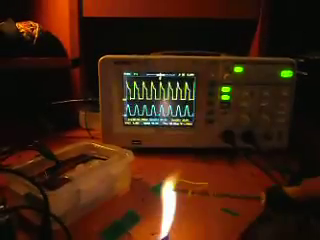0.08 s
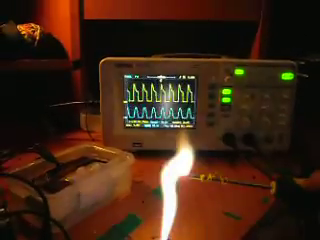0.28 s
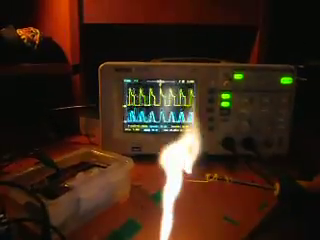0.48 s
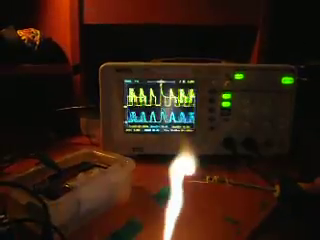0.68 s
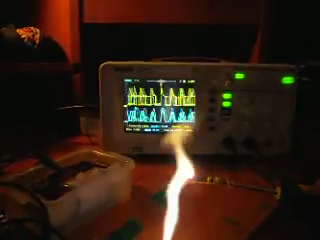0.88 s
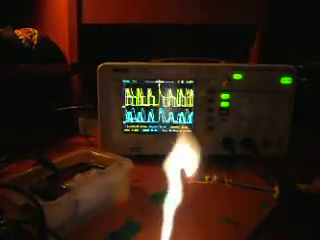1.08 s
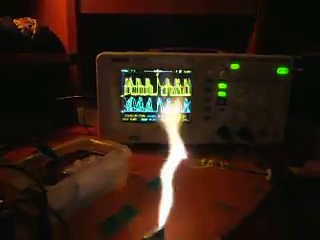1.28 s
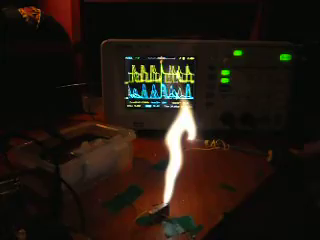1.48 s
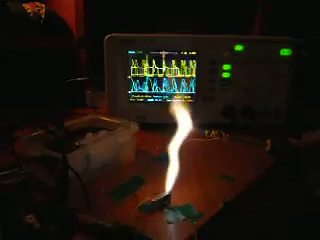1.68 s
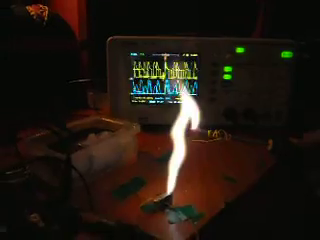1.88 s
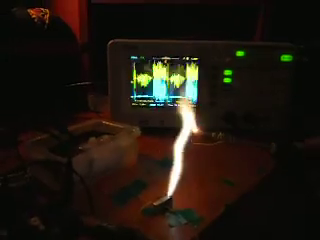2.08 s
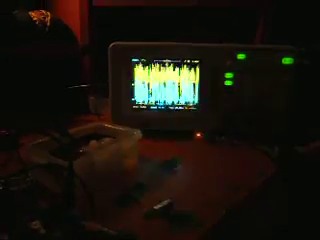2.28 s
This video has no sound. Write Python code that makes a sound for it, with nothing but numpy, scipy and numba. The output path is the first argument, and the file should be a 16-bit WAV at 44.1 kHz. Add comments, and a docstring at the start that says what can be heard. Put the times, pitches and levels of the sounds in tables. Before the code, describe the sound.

High-voltage electric arc buzzing and crackling in harsh, broken bursts, growing denser, then sputtering out

```python
"""A faint hiss and a thin steady whine come first, then the weak, broken buzzes of a high-voltage arc in a workshop.
The buzz soon grows loud: the arc restrikes about 850 to 8000 times a second in short runs whose rate often sags
as it stretches, until it breaks and sputters. Each spark is a pulse, with the hiss of hot gas added to ragged runs.
The whine is a sine, the hiss beneath is filtered noise, the short room tail is decaying noise convolved with the
arc, and the microphone stage flattens the loudest peaks."""
import sys
import numpy as np
from scipy import signal
from scipy.fft import rfft, irfft
from scipy.io import wavfile
from scipy.ndimage import uniform_filter1d
from numba import njit

SR = 44100
rng = np.random.default_rng(int(sys.argv[2]) if len(sys.argv) > 2 else 0)


def wav_record(signal):
    """Record a signal, one row per channel, as 16-bit PCM in the file named by sys.argv[1]."""
    frames = np.transpose(np.atleast_2d(signal))
    bounded = np.clip(frames, -1, 1)
    # unit amplitude maps onto the largest positive 16-bit level
    quanta = np.round(bounded * 32767).astype(np.int16)
    wavfile.write(sys.argv[1], SR, quanta)


def natural_amplitude(level_db):
    """Convert a level in decibels to a linear amplitude factor, elementwise."""
    exponent = np.asarray(level_db, float) / 20
    return 10 ** exponent


N = 105840  # length in samples


def unit(x):
    """Normalisation: scale a signal to an rms of 1."""
    return x / np.sqrt(np.mean(x ** 2))


def colour(x, points, size=1024):
    """Minimum-phase filtering: the folded cepstrum turns (f/Hz, gain/dB) points into a causal response."""
    p = np.array(points)
    f = np.arange(size + 1) * SR / size / 2
    gain_db = np.interp(np.log(f + 1), np.log(p[:, 0]), p[:, 1])
    cepstrum = irfft(np.log(natural_amplitude(gain_db)))
    cepstrum[1:size] *= 2
    cepstrum[size + 1:] = 0
    response = irfft(np.exp(rfft(cepstrum)))
    return signal.fftconvolve(x, response)[:N]


def walk(hz):
    """Random modulation: a new Gaussian level every 1 / hz seconds, joined by ramps, with an rms of 1."""
    hold = int(SR / hz)
    levels = np.repeat(rng.standard_normal(N // hold + 1), hold)
    return unit(uniform_filter1d(levels, hold)[:N])


# spectral shape of the noise floor: (f/Hz, relative level/dB)
FLOOR_SHAPE = [(18, -27.5), (30, -5.5), (319, -11.5), (607, -5.5), (717, -20), (868, -3.5), (1470, -21),
               (6000, -22), (8180, -28.5), (9000, -52), (11700, -88.5), (19800, -120)]
FLOOR_DB = -52.5  # rms level


def noise_floor():
    """Stationary random noise: white noise shaped in frequency and set to a fixed rms level."""
    return natural_amplitude(FLOOR_DB) * unit(colour(rng.standard_normal(N), FLOOR_SHAPE))


# level of the whine before the microphone stage: (t/s, rms level/dB)
WHINE_LEVEL = [(0, -41.5), (.9, -43), (1.1, -48), (1.3, -83), (2.4, -59)]
WHINE_HZ = 873


def whine():
    """Pure tone: a sine of constant frequency that fades after 1.1 s as the arc burns on, then creeps up faintly."""
    t = np.arange(N) / SR
    points = np.array(WHINE_LEVEL)
    rms = natural_amplitude(np.interp(t, points[:, 0], points[:, 1]))
    return np.sqrt(2) * rms * np.sin(2 * np.pi * WHINE_HZ * t)


DRIVER_HZ, LOCK_BELOW_HZ = 24050., 2700.  # ultrasonic driver; rate below which restrikes follow its cycles


@njit
def strikes(hz, scatter, late, size, driver, lock):
    """Relaxation oscillation: a spark at each wrap of the phase, then a new period drawn for the next cycle."""
    out, phase, step = np.zeros(len(hz) + 1), 0., .1
    for i in range(len(hz)):
        phase += step
        if phase >= 1:
            # share the spark between two samples to place it between them
            late_part = (phase - 1) / step
            out[i] += size[i] * late_part
            out[i + 1] += size[i] * (1 - late_part)
            rate = hz[i] * np.exp(scatter[i] * late[i])
            if rate < lock:
                # slow periods last a whole number of driver cycles
                rate = driver / np.round(driver / rate)
            step = rate / SR
            phase = late_part * step
    return out[:-1]


# runs of restrikes before drift and flutter:
# (start t/s, length t/s, first rate f/Hz, last rate f/Hz, level/dB, timing scatter 0-1)
RUNS = [ (.007, 0.0098, 3623, 3524, -44, 0.18), (.038, .007, 3004, 3599, -44.5, 0.24),
        (0.07, 0.0043, 3486, 3492, -45, 0.34), (0.084, 0.0046, 3611, 3500, -39, 0.22),
        (.093, .009, 3611, 3505, -34, 0.16), (.103, .007, 3992, 3989, -39.5, 0.35),
        (0.113, 0.0038, 3654, 3504, -40, 0.23), (0.128, 0.0051, 4507, 4500, -44.5, .3),
        (0.152, 0.0061, 3500, 3502, -49, 0.46), (0.172, 0.0078, 3003, 3019, -35, .3),
        (0.183, 0.021, 2998, 3561, -37, 0.21), (0.206, 0.0053, 2921, 2903, -32.5, .2),
        (0.218, .017, 1606, 1209, -12.5, .1), (.234, 0.0084, 1756, 1736, -12.5, .1),
        (0.244, .004, 1600, 1493, -17, .3), (.29, 0.0076, 2990, 3000, -30.5, .3),
        (0.299, .018, 1543, 1256, -12, .1), (0.323, 0.0038, 1610, 1503, -9.5, 0.21),
        (0.353, .003, 1497, 1496, -15.5, 0.32), (0.36, .008, 1692, 1599, -12.5, 0.02),
        (.374, 0.028, 1605, 955, -10.5, 0.2), (0.405, 0.012, 1857, 1849, -10, 0.12),
        (0.432, 0.024, 1951, 959.5, -8.5, 0.13), (.462, 0.0072, 1101, 904, -11.5, 0.11),
        (0.469, .016, 1477, 2011, -8.5, 0.06), (0.521, .002, 2000, 2000, -16.5, .3),
        (0.532, 0.018, 1595, 956.8, -12, 0.12), (0.553, 0.012, 1550, 1900, -10, 0.2),
        (.613, 0.0078, 3000, 3000, -33.5, .3), (0.627, .005, 3000, 2992, -30.5, 0.27),
        (.678, .004, 3003, 2471, -28.5, 0.31), (.69, 0.013, 1554, 1200, -9.5, 0.09),
        (.705, 0.015, 1859, 1897, -9.5, 0.08), (0.766, 0.015, 1554, 1048, -10.5, 0.14),
        (0.781, 0.0093, 1793, 1833, -10.5, 0.14), (0.844, 0.014, 1549, 1296, -14, 0.14),
        (0.8684, .001, 2862, 2900, -9.5, .3), (0.908, 0.0056, 2795, 2805, -30, .3),
        (0.916, 0.027, 1743, 950, -9.5, 0.06), (.992, 0.0046, 1802, 1803, -10.5, 0.25),
        (1.005, 0.044, 1898, 1800, -11.5, 0.1), (1.06, .003, 1995, 1988, -9.5, .3),
        (1.067, .004, 2503, 2499, -24.5, 0.23), (1.078, .021, 1918, 844.8, -12, 0.07),
        (1.106, 0.046, 1797, 1713, -11, 0.14), (1.151, 0.022, 1505, 897.4, -9, 0.07),
        (1.178, 0.0051, 2500, 2044, -10.5, .05), (1.183, .014, 1860, 1845, -8, 0.03),
        (1.197, .013, 1800, 1550, -9.5, 0.08), (1.21, 0.041, 1950, 1447, -11, .07),
        (1.261, .011, 1586, 1199, -8, 0.09), (1.268, 0.0057, 2110, 1996, -8, 0.02),
        (1.274, .016, 1851, 1840, -6.5, 0.02), (1.291, 0.034, 1800, 1600, -9.5, 0.07),
        (1.327, 0.02, 1507, 854, -8.5, 0.08), (1.347, 0.014, 2100, 1992, -9.5, 0.07),
        (1.361, 0.019, 1873, 1650, -10.5, 0.03), (1.38, 0.041, 1957, 1454, -7, .04),
        (1.424, 0.0095, 1290, 900, -7.5, 0.09), (1.434, 0.047, 1902, 1803, -9.5, 0.06),
        (1.484, .019, 1700, 895.4, -5.5, 0.07), (1.503, 0.0054, 7088, 7452, -5.5, 0),
        (1.512, 0.014, 2617, 1909, -5.5, 0.1), (1.54, 0.021, 1903, 1485, -7, .03),
        (1.561, 0.012, 1400, 850.4, -12.5, 0.1), (1.575, 0.025, 1706, 1900, -7, 0.11),
        (1.602, .017, 2058, 2066, -11.5, 0.04), (1.615, .028, 1857, 1695, -7.5, 0.01),
        (1.645, .015, 1493, 897, -8, 0.09), (1.662, .009, 7273, 7346, -11.5, 0),
        (1.67, .017, 2609, 1720, -8.5, 0.06), (1.686, .006, 1776, 1808, -33.5, 0.35),
        (1.706, .017, 1909, 1700, -6.5, .01), (1.721, 0.012, 1550, 896.6, -7.5, .04),
        (1.732, 0.0085, 7288, 7346, -11.5, .03), (1.743, .018, 1783, 1650, -7.5, 0.01),
        (1.762, 0.024, 2107, 1900, -12, 0.08), (1.785, 0.02, 1912, 1652, -5.5, 0.01),
        (1.805, .012, 1306, 900, -11.5, .06), (1.817, .014, 7300, 8000, -12, 0.05),
        (1.833, 0.0047, 2500, 2173, -9, .05), (1.839, .025, 1998, 1948, -10, 0.06),
        (1.867, .028, 1829, 1504, -8, 0.01), (1.894, 0.0098, 1300, 995.5, -8.5, 0.14),
        (1.902, .011, 7593, 8000, -11, 0.01), (1.917, 0.0065, 2509, 2290, -7, .05),
        (1.923, .017, 1945, 2016, -11.5, 0), (1.941, 0.014, 1737, 1295, -9, 0.01),
        (1.951, .008, 7680, 7504, -9.5, 0.09), (1.965, .002, 7800, 7814, -0.5, .05),
        (1.972, .002, 7400, 7400, -12, 0.14), (1.986, 0.00096, 7490, 7494, -29.5, .1),
        (2.024, .002, 7000, 7000, -26, .2), (2.042, .007, 4400, 4425, -16.5, 0.24),
        (2.053, 0.0023, 7300, 7300, -14.5, 0.09), (2.06, 0.0044, 4512, 4493, -17, 0.14),
        (2.072, 0.0043, 4553, 4740, -19.5, 0.08), (2.079, 0.0021, 4600, 4591, -14, 0.09),
        (2.119, 0.0019, 4975, 5100, -31.5, 0.42), (2.126, .012, 5204, 4200, -14, 0.15)]
EDGE_S, SAG_BEND = .0007, 1.6  # half-width of a run's rise and fall; over 1 the rate bends late in the run
WANDER, WANDER_HZ = .03, 250.55  # rms share by which the rate drifts, and how often it turns
PATCH_DB, PATCH_HZ = 4, 160  # most the timing scatter swings either way, and how often
SIZE_DB = 2  # rms scatter of spark size when ragged
FLUTTER_DB, FLUTTER_HZ = 4, 349.8  # rms flutter of the level, and how often it turns
FIZZ_DB = -3  # hiss of hot gas at a timing scatter of 1


def arc():
    """Repeated spark discharge: pulse trains and gas hiss share an envelope; ragged stretches vary in time and size."""
    t = np.arange(N) / SR
    hz, scatter, envelope = np.full(N, 2000.), np.zeros(N), np.zeros(N)
    for start, length, first_hz, last_hz, db, rough in RUNS:
        end = start + length
        i = slice(int((start - EDGE_S) * SR), int((end + EDGE_S) * SR))
        along = np.clip((t[i] - start) / length, 0, 1)
        hz[i] = first_hz * (last_hz / first_hz) ** (along ** SAG_BEND)
        scatter[i] = np.clip(rough, 0, 1)
        edge = np.minimum(t[i] - start, end - t[i]) / EDGE_S
        gate = np.clip((edge + 1) / 2, 0, 1)
        envelope[i] = np.maximum(envelope[i], natural_amplitude(db) * gate)
    hz = hz * (1 + WANDER * walk(WANDER_HZ))
    scatter = scatter * natural_amplitude(PATCH_DB * np.tanh(walk(PATCH_HZ)))
    late, size_draw = rng.standard_normal((2, N))
    size = natural_amplitude(SIZE_DB * np.tanh(10 * scatter) * size_draw)
    sparks = strikes(hz, scatter, late, size, DRIVER_HZ, LOCK_BELOW_HZ)
    sparks = sparks * np.sqrt(SR / hz)  # equal power at every rate
    pulses = sparks - uniform_filter1d(sparks, size=200)  # remove the slow mean
    fizz = natural_amplitude(FIZZ_DB) * scatter * rng.standard_normal(N)
    flutter = natural_amplitude(FLUTTER_DB * walk(FLUTTER_HZ))
    scale = np.std(colour(rng.standard_normal(N), SPARK_COLOUR))  # undo the gain of the direct colour
    return envelope * flutter * (pulses + fizz) / scale


# colour of a spark at the microphone: (f/Hz, gain/dB)
SPARK_COLOUR = [(100, -41.5), (440, -30.5), (530, -16.5), (630, -26.5), (800, -7), (1100, -1.5),
                (1400, -11.5), (1750, 0.5), (2300, -7.5), (2900, -1.5), (3300, -11), (3700, -5),
                (4100, -11.5), (4600, 0), (5200, -7.5), (5650, 1.5), (6100, -9.5), (6700, -9.5), (7250, -4),
                (7700, -13), (8300, -23), (9000, -30), (12000, -30.5)]


def direct_sound(source):
    """Linear filtering on the direct path: resonant peaks and dips colour each spark."""
    return colour(source, SPARK_COLOUR)


# colour of a spark in the room: (f/Hz, gain/dB)
ECHO_COLOUR = [(100, -32.5), (400, -19.5), (800, -5), (1200, -5.5), (1800, 1.5), (2400, -2), (3500, -5),
               (5000, -4.5), (7000, -5), (8300, -19.5), (12000, -29.5)]
ROOM_T60_S, ROOM_DB, ROOM_GAP_S = 0.2, -15.5, 0.0023  # decay by 60 dB, gain of the tail, gap before it


def room(source):
    """Reverberation: dense reflections, as exponentially decaying noise, follow after a short gap."""
    t = np.arange(SR // 2) / SR
    decay = np.exp(-np.log(1000) * t / ROOM_T60_S)
    tail = rng.standard_normal(len(t)) * decay * (t > ROOM_GAP_S)
    tail = tail / np.sqrt(np.sum(tail ** 2))
    return natural_amplitude(ROOM_DB) * signal.fftconvolve(colour(source, ECHO_COLOUR), tail)[:N]


def scene():
    """Superposition: the whine adds to the arc heard directly and through the room."""
    source = arc()
    return (whine() + direct_sound(source) + room(source))[None]


def squash(x, top, order):
    """Saturation: a soft clip at +-top, with a sharper knee at higher order."""
    return x / (1 + np.abs(x / top) ** order) ** (1 / order)


OVERLOAD, CEILING = .66, .73  # amplitudes at which the microphone stage and the output flatten peaks
LOW_HZ, TOP_HZ = 381, 8620  # band passed between the two


def band_limit(x):
    """A steep low-pass at the top of the band."""
    return signal.sosfilt(signal.butter(12, 16470, fs=SR, output="sos"), x)


def record(dry):
    """Saturation and band limiting: the microphone stage overloads, bass and treble are cut, noise joins, peaks clip."""
    overloaded = squash(dry, OVERLOAD, order=4)
    bass_cut = signal.butter(1, LOW_HZ, "high", fs=SR, output="sos")
    treble_cut = signal.ellip(6, .5, 50, TOP_HZ, fs=SR, output="sos")
    band = signal.sosfiltfilt(treble_cut, signal.sosfilt(bass_cut, overloaded))
    mix = squash(band + noise_floor(), CEILING, order=16)
    return band_limit(mix)


dry = scene()
out = record(dry)
wav_record(out)
```